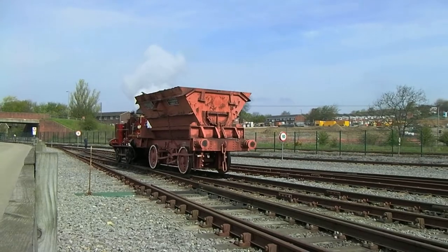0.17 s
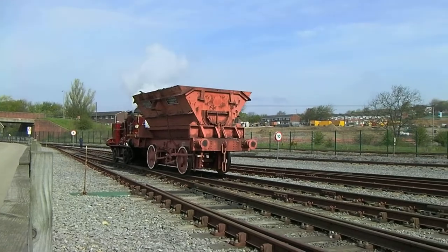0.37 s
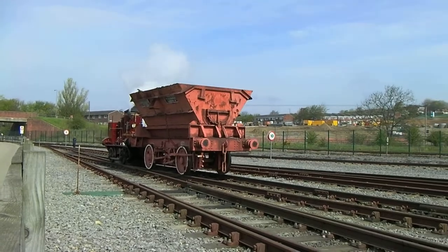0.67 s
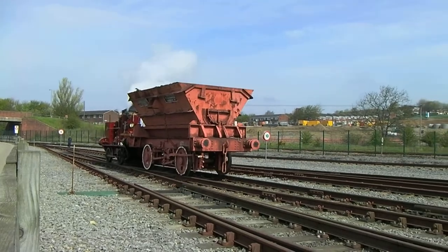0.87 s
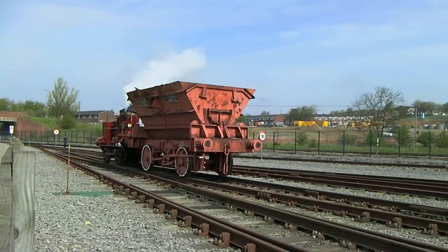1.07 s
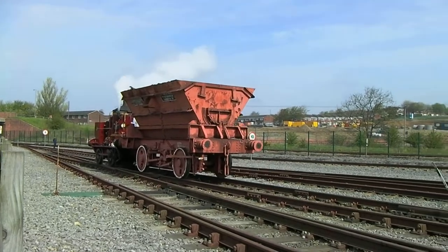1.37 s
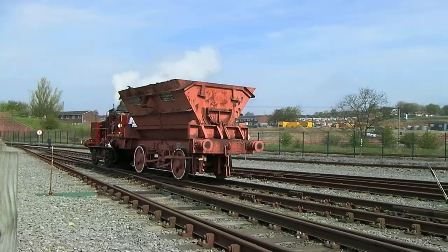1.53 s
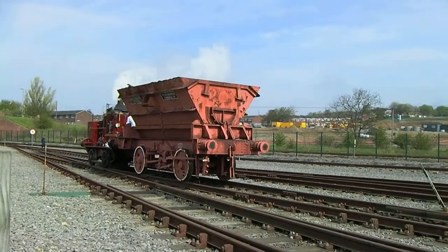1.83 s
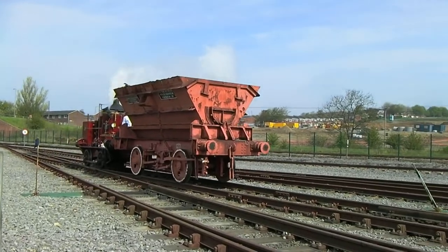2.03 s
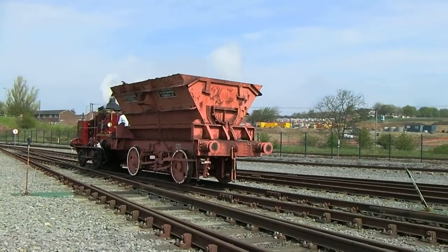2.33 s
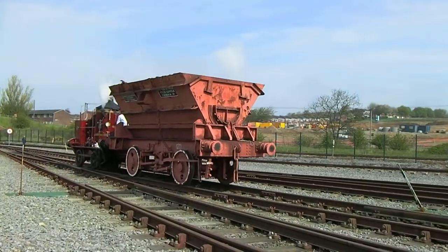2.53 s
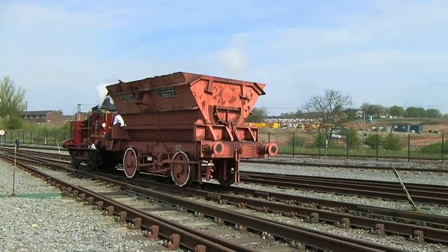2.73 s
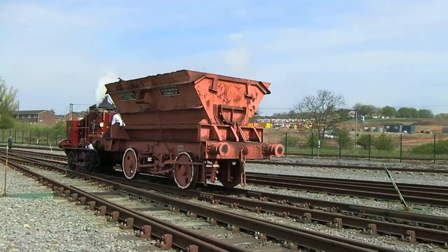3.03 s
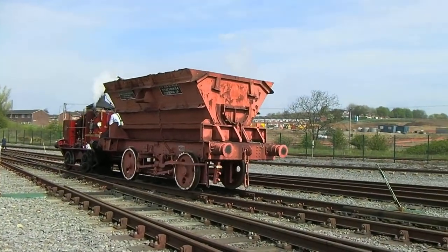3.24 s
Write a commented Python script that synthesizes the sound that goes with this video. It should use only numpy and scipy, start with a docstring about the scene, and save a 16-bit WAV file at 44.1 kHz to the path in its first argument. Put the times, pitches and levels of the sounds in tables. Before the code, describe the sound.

Bright, swelling steam hiss from a small engine, with faint chuffs and dull wagon knocks outdoors

```python
"""An open yard, where a small steam locomotive slowly shunts a hopper wagon.
A bright jet of steam swells and sinks as flickering noise with two ringing bands; steam round the cylinders
is a broad rush with resonances, most of which sag as the engine moves. Underneath, noise bursts make faint
exhaust chuffs, and the wagon rumbles and knocks over the track with decaying thumps and ringing noise.
The coupling clanks once in decaying modes, flanges scrape and squeal, and a breeze touches the microphone."""
import sys
import numpy as np
from scipy import signal
from scipy.fft import rfft, irfft
from scipy.io import wavfile

SR = 44100
rng = np.random.default_rng(int(sys.argv[2]) if len(sys.argv) > 2 else 0)


def transcribe(signal):
    """Save signal, clipped to [-1, 1], as a 16-bit WAV file at the path in sys.argv[1]."""
    frames = np.atleast_2d(signal).T
    limited = np.clip(frames, -1, 1)
    pcm = np.round(limited * 32767).astype(np.int16)
    wavfile.write(sys.argv[1], SR, pcm)


N = 149940
TIME = np.arange(N) / SR
HZ = np.maximum(np.arange(N // 2 + 1) * SR / N, 1)


def from_db(db):
    """Logarithmic level: 20 dB is a factor of ten in amplitude."""
    return 10 ** (np.asarray(db) / 20)


def rms_one(x):
    """Normalisation by effective value: scale to unit rms."""
    return x / np.sqrt(np.mean(x ** 2) + 1e-20)


def in_time(rows):
    """Linear interpolation of each column of a time curve, at every sample."""
    seconds, *columns = np.transpose(rows)
    return [np.interp(TIME, seconds, column) for column in columns]


def over_hz(points):
    """Interpolation along a logarithmic frequency axis, at every frequency."""
    hz, value = np.transpose(points)
    return np.interp(np.log(HZ), np.log(hz), value)


def drift(rate):
    """Low-passed random process: slow wander of spread 1, through two equal poles at `rate` Hz."""
    step = 100  # samples between computed points
    pole = np.exp(-2 * np.pi * rate * step / SR)
    white = rng.standard_normal(N // step + 1002)
    slow = signal.lfilter([1], [1, -2 * pole, pole * pole], white)[1000:]  # skip the settling
    return np.interp(np.arange(N) / step, np.arange(len(slow)), rms_one(slow))


# Likeness of the two sides. Each row: frequency in Hz, left-right correlation from 0 to 1.
LIKENESS = [(40, .88), (100, .98), (370, .9), (700, .9), (2000, .94), (3000, .84), (3400, .74), (4000, .8),
            (4500, .54), (5200, .68), (5750, .99), (6250, .99), (6600, .75), (7000, .54), (8000, .72),
            (9000, .83), (10500, .72), (11500, .55), (12400, .18), (13700, .2), (14500, .5), (15500, .7)]


def stereo_spectrum():
    """Stereo coherence: white noise whose mid and side parts set how alike the two sides are."""
    alike = np.clip(over_hz(LIKENESS), 0, .995)
    mid, side = rfft(rng.standard_normal((2, N)))
    return np.sqrt(1 + alike) * mid + np.sqrt(1 - alike) * side * [[1], [-1]]


def turbulence(colour, flicker_db, rate, count=14):
    """Turbulent noise: coloured, in overlapping bands that flicker partly together, partly alone; rms 1."""
    spectrum = stereo_spectrum() * from_db(over_hz(colour))
    ends = np.log([colour[0][0], colour[-1][0]])
    place = np.interp(np.log(HZ), ends, [0, count - 1])
    together = drift(rate)
    total = 0
    for k in range(count):
        band = irfft(spectrum * np.maximum(1 - abs(place - k), 0), N)
        # flicker_db is the spread of each band's own wander; the shared wander is half as wide
        total = total + band * from_db(flicker_db * (.5 * together + drift(rate)))
    return rms_one(total)


def resonance(hz, width_hz):
    """Resonance excited by noise: a peak, 3.6 dB down at the edges of its width, that may glide; rms 1."""
    centre = np.mean(hz)
    response = 1 / (1 + (1.44 * (HZ - centre) / width_hz) ** 2)
    band = irfft(stereo_spectrum() * response, N)
    # shifting the analytic signal moves the whole peak along the glide
    glide = np.cumsum(np.zeros(N) + hz - centre) / SR
    return rms_one(np.real(signal.hilbert(band) * np.exp(2j * np.pi * glide)))


def burst(start, attack, hold, release):
    """Transient envelope: straight rise, hold until `hold` after the start, exponential fall."""
    age = TIME - start
    return np.clip(age / attack, 0, 1) * np.exp(-np.maximum(age - hold, 0) / release)


# Swell of the bright jet and of its top treble. Each row: time in seconds, level in dB before the raise.
JET_LEVEL = [(0, -27.5), (.13, -32), (.45, -29), (.7, -32.5), (.91, -32), (1.06, -26), (1.23, -22),
             (1.32, -22.5), (1.37, -28), (1.5, -28), (1.56, -20.5), (1.66, -24), (1.78, -24.5),
             (1.83, -25.5), (1.97, -24.5), (2.12, -31), (2.22, -27), (2.36, -29), (2.5, -25.5), (2.57, -27),
             (2.66, -22.5), (2.78, -27.5), (2.83, -24.5), (2.97, -28), (3.03, -29.5), (3.4, -24.5)]
SIZZLE_LEVEL = [(0.0, -37), (0.14, -43), (0.25, -34), (0.28, -38), (0.43, -33), (0.92, -40), (0.95, -35),
                (1.2, -31), (1.5, -39), (1.56, -29), (1.59, -33), (1.63, -28), (1.69, -32), (2.26, -32.5),
                (2.31, -37), (2.53, -30.5), (2.67, -34.5), (2.91, -29.5), (3.09, -35.5), (3.4, -31)]
JET_RAISE_DB, SIZZLE_RAISE_DB = 1.3, 10.5
# Colour of the jet and of its top. Each row: frequency in Hz, relative density in dB per Hz.
JET_COLOUR = [(3000, -23.5), (5000, -10.5), (6000, -5.5), (6800, -9.5), (7600, -6), (8300, -3.5),
              (8700, -1), (9150, -1), (9650, 1), (10100, 1), (10700, .5), (11400, 1), (12000, -4),
              (12800, -10), (13600, -10), (15500, -26)]
SIZZLE_COLOUR = [(10000, -28), (12500, -8), (13400, -3), (14200, 1.5), (15000, -2.5), (16000, 1)]
# Two ringing bands of the jet. Each row: time in seconds, centre in Hz, level in dB.
JET_LOW_RING = [(0, 9260, -46), (1.2, 9340, -44), (1.45, 9300, -38), (1.62, 9250, -27), (1.95, 9070, -27.5),
                (2.15, 9090, -40), (2.7, 9284, -31), (3.05, 9200, -42), (3.4, 9290, -32)]
JET_HIGH_RING = [(0, 11150, -54), (.48, 11020, -36), (.8, 10880, -57), (1.3, 10620, -31),
                 (1.45, 10610, -42), (1.62, 10620, -23.5), (2.1, 10660, -37.5), (2.3, 10600, -34.5),
                 (3.4, 10410, -31)]
JET_RING_WIDTH_HZ = 330


def steam_jet():
    """Jet noise: bright hiss, two ringing bands and a sizzling top, swelling as the plume blows about."""
    (jet_db,), (sizzle_db,) = in_time(JET_LEVEL), in_time(SIZZLE_LEVEL)
    hiss = turbulence(JET_COLOUR, flicker_db=1.58, rate=10.5, count=22)
    sizzle = turbulence(SIZZLE_COLOUR, flicker_db=1, rate=8.5, count=8)
    out = from_db(jet_db + JET_RAISE_DB) * hiss + from_db(sizzle_db + SIZZLE_RAISE_DB) * sizzle
    for ring in (JET_LOW_RING, JET_HIGH_RING):
        hz, db = in_time(ring)
        out = out + from_db(db) * resonance(hz, JET_RING_WIDTH_HZ)
    return out


# Swell of the steam round the cylinders. Each row: time in seconds, level in dB.
RUSH_LEVEL = [(0, -31.5), (1.05, -30.5), (1.16, -27.5), (1.62, -25.5), (1.7, -29), (2.52, -30.5),
              (2.69, -27), (3.05, -29), (3.4, -26)]
# Colour of that steam. Each row: frequency in Hz, relative density in dB per Hz.
RUSH_COLOUR = [(600, -17.5), (1250, -12.5), (1520, -1), (1700, -2.5), (2150, -5), (2700, 1.5), (3250, 1),
               (3550, -2), (3750, -0.5), (4400, 2), (4850, -1), (5250, 1.5), (6000, 1), (7200, -4),
               (9000, -4.5), (13000, -16.5)]
# Five hollow resonances of that steam. Each row: time in seconds, centre in Hz, level in dB.
BOTTOM_HOLLOW = [(0, 2273, -38.5), (.8, 2197, -40.5), (1.248, 2061, -40), (1.55, 2154, -38),
                 (1.749, 2059, -41.5), (2.349, 1933, -40), (2.8, 1838, -43), (3.4, 1746, -39.5)]
LOWER_HOLLOW = [(0, 2901, -48), (0.451, 2849, -43), (.7, 2779, -37), (1.2, 2792, -36), (1.749, 2765, -34),
                (2.301, 2726, -33), (2.9, 2680, -29.5), (3.4, 2601, -33)]
MIDDLE_HOLLOW = [(0, 3525, -41), (.27, 3500, -37.5), (.5, 3520, -47), (1, 3491, -49), (1.2, 3465, -41),
                 (1.6, 3473, -38), (1.8, 3490, -47), (2.4, 3556, -38), (3.4, 3486, -36.5)]
UPPER_HOLLOW = [(0, 4042, -49), (.9, 4026, -37), (1.35, 4027, -29), (1.65, 4014, -34), (1.9, 4021, -32),
                (2.3, 3948, -35.5), (2.75, 3869, -31.5), (3.05, 3762, -35.5), (3.4, 3640, -34.5)]
TOP_HOLLOW = [(0, 5550, -50), (1.3, 5254, -48), (2.1, 5167, -49), (2.9, 4725, -45), (3.299, 4423, -31.5)]
# Widths of the five resonances in Hz, from bottom to top.
HOLLOW_WIDTHS_HZ = (277, 440, 170, 338, 400)


def cylinder_steam():
    """Resonant filtering of flow noise: a broad rush with hollows, most sinking as the engine moves."""
    rush_db, = in_time(RUSH_LEVEL)
    out = from_db(rush_db) * turbulence(RUSH_COLOUR, flicker_db=1.5, rate=5.6, count=24)
    hollows = (BOTTOM_HOLLOW, LOWER_HOLLOW, MIDDLE_HOLLOW, UPPER_HOLLOW, TOP_HOLLOW)
    for hollow, width_hz in zip(hollows, HOLLOW_WIDTHS_HZ):
        hz, db = in_time(hollow)
        out = out + from_db(db) * resonance(hz, width_hz)
    return out


def flutter():
    """Amplitude modulation: fine, fast sputter of escaping steam, as a gain of rms 1."""
    return rms_one(from_db(.5 * drift(90)))


# Swell of the rolling wagon. Each row: time in seconds, level in dB before the raise.
ROLL_LEVEL = [(0.0, -41.5), (0.45, -42.5), (0.68, -36.5), (0.83, -42), (1.98, -43), (2.28, -37.5),
              (2.55, -42), (3.4, -38.5)]
ROLL_RAISE_DB = 2.5
# Colour of the rolling. Each row: frequency in Hz, relative density in dB per Hz.
ROLL_COLOUR = [(20, -44), (33, -33), (47, -13), (65, -2.5), (85, 6), (120, 0), (190, -4.5), (260, -5.5),
               (370, -1), (480, -2.5), (700, -2), (1000, -5.5), (1400, -6), (2500, -17.5)]
# Drone of the fire and boiler. Each row: time in seconds, level in dB.
DRONE_LEVEL = [(0, -51), (.45, -49), (.6, -46), (.92, -43), (1.1, -49), (1.3, -50), (1.9, -53), (2.3, -53),
               (2.8, -48), (3.4, -54)]
DRONE_HZ, DRONE_WIDTH_HZ = 87, 24


def rumble():
    """Rolling noise: wheels on rails as low turbulence, over the narrow-band drone of the engine."""
    (roll_db,), (drone_db,) = in_time(ROLL_LEVEL), in_time(DRONE_LEVEL)
    roll = from_db(roll_db + ROLL_RAISE_DB) * turbulence(ROLL_COLOUR, flicker_db=1.5, rate=27)
    return roll + from_db(drone_db) * resonance(DRONE_HZ, DRONE_WIDTH_HZ)


# Swell of the breeze. Each row: time in seconds, level in dB.
BREEZE_LEVEL = [(0, -52), (.5, -48), (1.1, -48), (1.3, -75), (3.4, -56)]
# Colour of the breeze. Each row: frequency in Hz, relative density in dB per Hz.
BREEZE_COLOUR = [(15, -34), (32, -18), (48, 9), (75, 2), (140, -23)]


def breeze():
    """Wind turbulence at the microphone: light, lumpy low noise that drops, then faintly returns."""
    level_db, = in_time(BREEZE_LEVEL)
    return from_db(level_db) * turbulence(BREEZE_COLOUR, flicker_db=5.0, rate=6, count=3)


# Wheel knocks on the track. Each row: start in seconds, thump level in dB, hopper ring level in dB.
KNOCKS = [(0.489, -26.5, -36.5), (.583, -30, -50), (0.667, -50, -43), (0.791, -36, -40), (.835, -46, -42),
          (1.093, -37.5, -54), (1.172, -36, -37), (2.073, -51, -39), (2.174, -52, -31), (2.187, -27, -52),
          (2.249, -50, -39), (2.291, -53, -41), (2.355, -54, -40), (2.70, -43, -47), (3.32, -39, -37)]
THUMP_HZ, THUMP_ATTACK_S, THUMP_DECAY_S = 130, .0057, .0057
THUMP_SCATTER = .039  # spread of the thump pitch, as a fraction
RATTLE_HZ, RATTLE_WIDTH_HZ, RATTLE_HOLD_S, RATTLE_DECAY_S = 190, 45, .027, .022
RATTLE_DB = -15  # relative to the thump
RING_HZ, RING_WIDTH_HZ, RING_ATTACK_S, RING_HOLD_S, RING_DECAY_S = 376, 67, .0024, .0049, .025
ROLLING_RING_DB = -51  # rolling keeps the hopper ringing faintly


def knocks():
    """Impact excitation: each knock is a low frame thump, a dull rattle and a ring of the hopper."""
    thumps, rattle, shake = 0, 0, from_db(ROLLING_RING_DB)
    detunes = rng.standard_normal(len(KNOCKS))
    for (start, thump_db, ring_db), detune in zip(KNOCKS, detunes):
        hz = THUMP_HZ * (1 + THUMP_SCATTER * detune)
        swing = np.sin(2 * np.pi * hz * (TIME - start))
        thump_shape = burst(start, THUMP_ATTACK_S, 2.4 * THUMP_ATTACK_S, THUMP_DECAY_S)
        rattle_shape = burst(start, THUMP_ATTACK_S, RATTLE_HOLD_S, RATTLE_DECAY_S)
        ring_shape = burst(start, RING_ATTACK_S, RING_HOLD_S, RING_DECAY_S)
        thumps = thumps + from_db(thump_db) * thump_shape * swing
        rattle = rattle + from_db(thump_db + RATTLE_DB) * rattle_shape
        shake = shake + from_db(ring_db) * ring_shape
    rattling = rattle * resonance(RATTLE_HZ, RATTLE_WIDTH_HZ)
    ringing = shake * resonance(RING_HZ, RING_WIDTH_HZ)
    return thumps + rattling + ringing


# Exhaust chuffs. Each row: start in seconds, time until the fall in seconds, level in dB,
# centre in Hz, spread to half amplitude on either side in octaves (before the treble roll-off).
CHUFFS = [(0.487, 0.04, -35.5, 850, 2), (0.668, .03, -43, 750, 1.2), (0.796, 0.03, -33.5, 950, 2.3),
          (1.163, 0.034, -32, 850, .95), (2.072, 0.032, -38, 850, 0.7), (2.173, .035, -39, 700, .55),
          (2.275, 0.02, -39, 1000, 0.68), (2.695, 0.029, -39.5, 910, 1.2), (2.881, 0.016, -35, 1300, 0.91),
          (3.137, 0.016, -34, 1250, .75), (3.315, 0.032, -40.5, 600, 1.3)]
CHUFF_ATTACK_S, CHUFF_RELEASE_S = .0026, .028


def chuffs():
    """Pulsed exhaust flow: short soft puffs of noise from the chimney, each around its own pitch."""
    out, air = 0, stereo_spectrum()
    for start, length, db, hz, octaves in CHUFFS:
        peak = 1 / (1 + (np.log2(HZ / hz) / octaves) ** 2)
        roll_off = 1 / np.hypot(1, (HZ / (3 * hz)) ** 2)
        puff = rms_one(irfft(air * peak * roll_off, N))
        out = out + from_db(db) * burst(start, CHUFF_ATTACK_S, length, CHUFF_RELEASE_S) * puff
    return out


# Modes of the coupling. Each row: frequency in Hz, relative level in dB, time to fall 60 dB in seconds.
CLANK_MODES = [(460, 0, 0.33), (737, 1, 0.24), (940, -3, 0.23), (1150, -5, .17)]
CLANK_S, CLANK_DB = 1.168, -31.5


def clank():
    """Modal vibration: the coupling is struck once and rings as a sum of decaying sines."""
    age = np.maximum(TIME - CLANK_S, 0)
    out = 0
    for hz, db, t60 in CLANK_MODES:
        out = out + from_db(CLANK_DB + db - 60 * age / t60) * np.sin(2 * np.pi * hz * age)
    return out


# Flange scrapes. Each row: start in seconds, time until the fall in seconds, level in dB, centre in Hz.
SCRAPES = [(1.564, .04, -40.5, 628), (1.837, .043, -38, 1540), (2.072, 0.029, -33.5, 680)]
SCRAPE_WIDTH_HZ, SCRAPE_ATTACK_S, SCRAPE_RELEASE_S = 110, .006, .018


def scrapes():
    """Sliding friction: flanges rub the rail in short bursts of narrow-band noise."""
    out = 0
    for start, length, db, hz in SCRAPES:
        shape = burst(start, SCRAPE_ATTACK_S, length, SCRAPE_RELEASE_S)
        out = out + from_db(db) * shape * resonance(hz, SCRAPE_WIDTH_HZ)
    return out


# Faint wheel squeal. Each row: time in seconds, centre in Hz, level in dB.
SQUEAL = [(1.64, 945, -72), (1.675, 974, -44), (1.73, 970, -46.5), (1.77, 1028, -47), (1.835, 1093, -43.5),
          (1.87, 1107, -68)]
SQUEAL_WIDTH_HZ = 28


def squeal():
    """Friction-excited resonance: flanges on the rail give a thin, rough, rising note."""
    hz, db = in_time(SQUEAL)
    return from_db(db) * resonance(hz, SQUEAL_WIDTH_HZ)


def scene():
    """Superposition: engine, wagon and wind add in the open air."""
    steam = steam_jet() * flutter() + cylinder_steam() * flutter()
    wagon = rumble() + knocks() + clank() + scrapes() + squeal()
    return steam + wagon + breeze() + chuffs()


# Left-right balance of the stereo widening. Each row: frequency in Hz, left minus right level in dB.
BALANCE_DB = [(100, -.7), (400, -1.3), (1000, 0), (2000, -1), (2700, -4.3), (3300, -2.8), (4000, -5.5),
              (4600, -4), (5200, -6), (5800, 0), (6300, 0), (7000, 3), (7900, 0), (9200, 3.3), (10700, 5.7),
              (12300, 1), (13200, 2), (14200, 9.5), (15700, 6)]
# Left-right phase of the stereo widening. Each row: frequency in Hz, phase by which left leads in radians.
LEAD = [(100, .05), (2200, 0), (3200, .55), (4000, .45), (4500, 1.3), (5000, 1.9), (5700, 3.05),
        (6300, 3.25), (7000, 4.3), (7400, 4.8), (7900, 6.2), (8500, 5.8), (10000, 6.5), (12100, 5.7),
        (13100, 7.6), (14100, 12), (15500, 11.8)]
NOTCH_HZ, NOTCH_WIDTH_HZ = 7830, 480
CUTOFF_HZ, CUTOFF_DB_PER_HZ = 15750, .3


def record(dry):
    """Linear filtering: stereo widening sets side levels and phase; one narrow notch, and the top is cut."""
    sides = np.array([[1], [-1]])
    pan = from_db(sides * over_hz(BALANCE_DB) / 2)
    pan = pan / np.sqrt(np.mean(pan ** 2, axis=0))  # keep the power of the two sides together
    lag = np.exp(-1j * over_hz(LEAD) * np.array([[0], [1]]))  # only the right lags
    notch = (HZ - NOTCH_HZ) / (HZ - NOTCH_HZ - .5j * NOTCH_WIDTH_HZ)
    low_pass = from_db(-np.clip((HZ - CUTOFF_HZ) * CUTOFF_DB_PER_HZ, 0, 90))
    return irfft(rfft(dry) * pan * lag * notch * low_pass, N)


dry = scene()
out = record(dry)
transcribe(out)
```